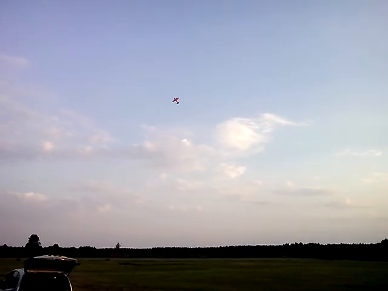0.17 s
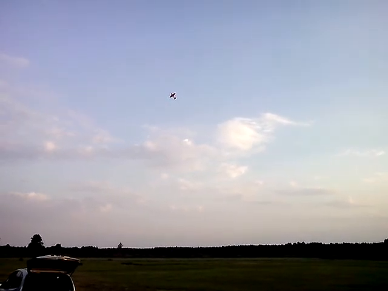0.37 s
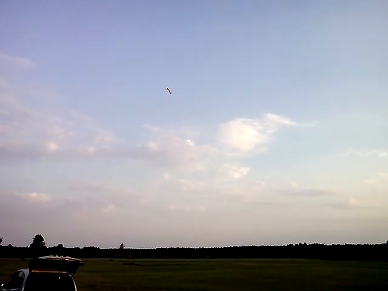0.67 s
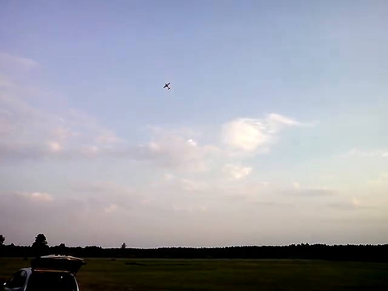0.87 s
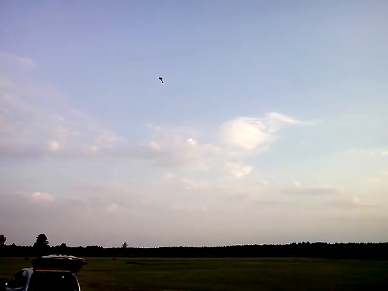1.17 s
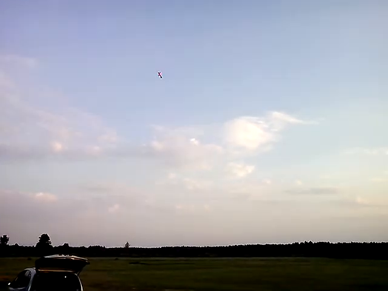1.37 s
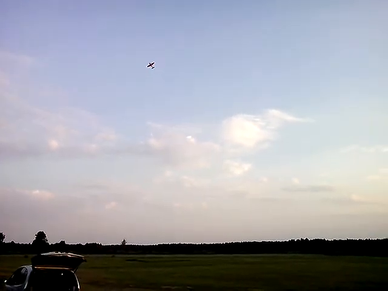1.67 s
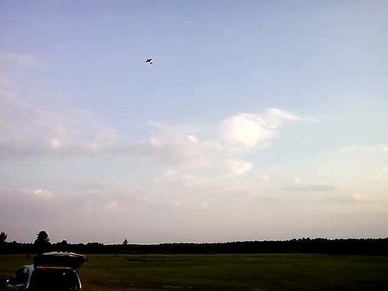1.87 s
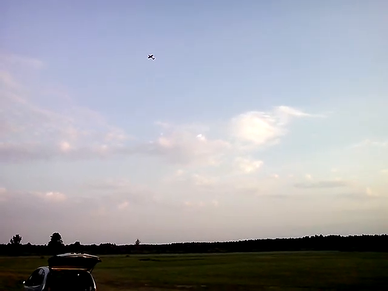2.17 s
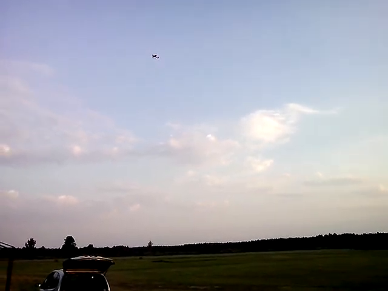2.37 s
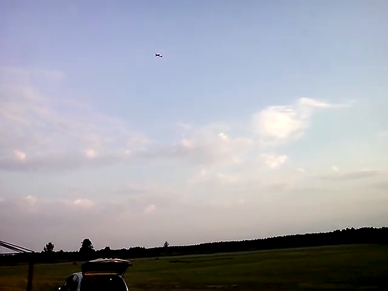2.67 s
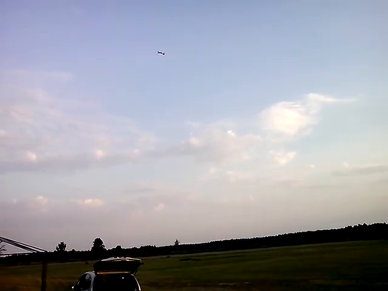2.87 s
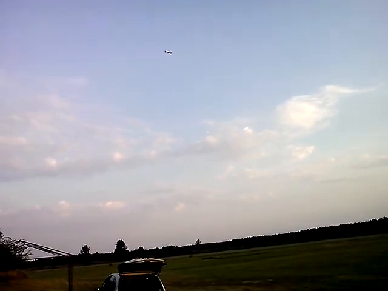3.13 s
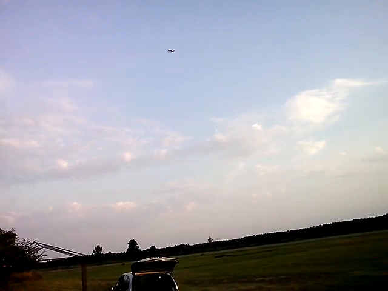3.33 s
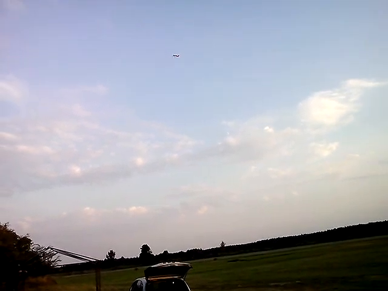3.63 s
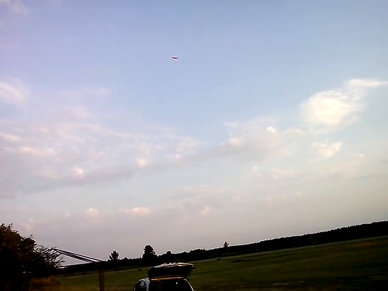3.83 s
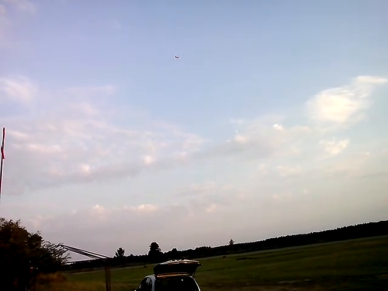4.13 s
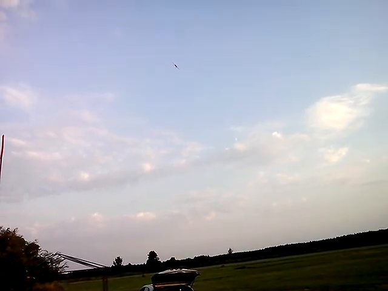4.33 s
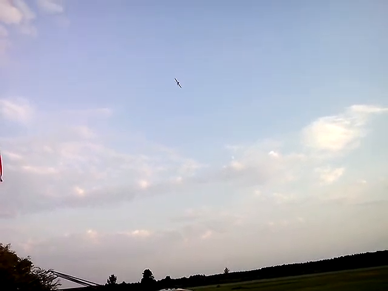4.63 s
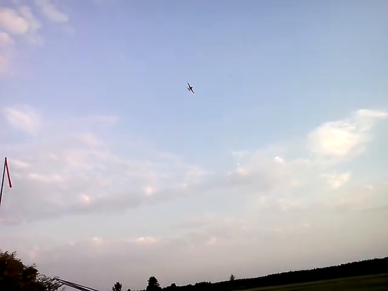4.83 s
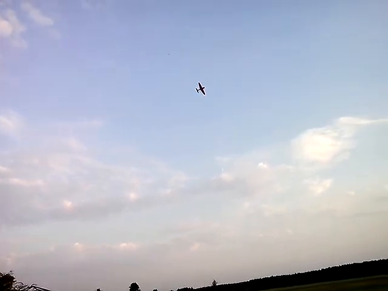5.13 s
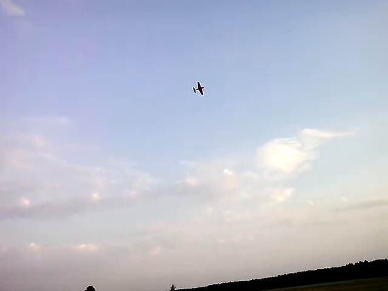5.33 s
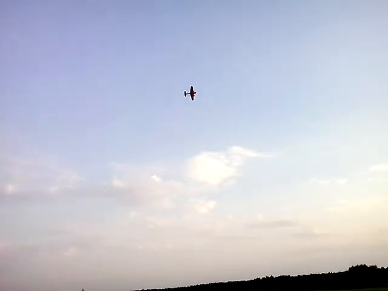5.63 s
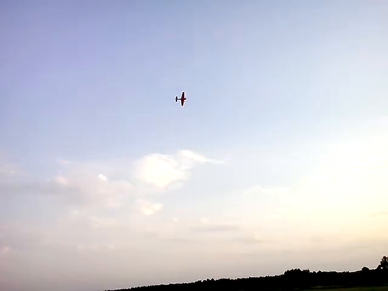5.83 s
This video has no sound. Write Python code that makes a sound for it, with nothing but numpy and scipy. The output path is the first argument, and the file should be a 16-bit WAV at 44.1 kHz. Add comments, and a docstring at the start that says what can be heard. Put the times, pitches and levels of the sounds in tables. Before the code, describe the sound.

Over an open field, a small model aircraft engine revs twice, drops to a popping idle, then buzzes loudly as it dives nearer.

```python
"""The buzz of a model plane's two-stroke petrol engine over an open field: two bursts of throttle, a
sputtering idle overhead, then full power as it swoops towards the listener. Each turn of the crankshaft
releases a pressure pulse that excites the resonances of pipe and muffler; shaft and propeller add
harmonic tones, and unburnt mixture pops after missed firings. The ground reflects the exhaust. Beneath
it the air rushes softly and a camera hums; the right channel trails the left."""
import sys
import numpy as np
from scipy import signal
from scipy.fft import rfft, irfft, next_fast_len
from scipy.io import wavfile
from scipy.ndimage import uniform_filter1d, map_coordinates

SR = 44100
rng = np.random.default_rng(int(sys.argv[2]) if len(sys.argv) > 2 else 0)


def master(y):
    """Save y as 16-bit WAV."""
    cut = np.clip(np.atleast_2d(y).T, -1, 1)
    pcm = np.round(cut * 32767)  # scale
    wavfile.write(sys.argv[1], SR, pcm.astype(np.int16))


N = 264600
TIME = np.arange(N) / SR

# Resonances of the muffler. Each row: frequency in Hz, relative gain in dB.
MUFFLER_RESPONSE = [(60, -20), (100, -11.5), (170, 2), (230, -2), (305, 5.5), (400, -17.5), (470, -5.5)]
# Hard firings after missed ones. Each row: start in seconds, relative level in dB, rasp offset in dB.
AFTERFIRES = [(0.695, -20.5, -17), (0.714, -15, -16), (0.735, -16, -14.5), (0.756, -20, -9.5),
              (1.836, -19, -15.5), (1.869, -16.5, -22.5), (1.903, -16.5, -23), (1.952, -19, -26.5),
              (2.03, -24.5, -24), (2.548, -29.5, -13.5), (2.594, -32, -16), (2.641, -30.5, -11.5),
              (2.664, -28.5, -17), (2.685, -26, -18), (2.705, -26.5, -16.5), (2.91, -27.5, -24),
              (3.593, -38, -23), (3.87, -29.5, -17.5), (3.897, -31, -20), (3.951, -30.5, -17.5),
              (4.031, -29.5, -18), (4.078, -25.5, -14.5), (4.1, -24, -20), (4.121, -25.5, -20),
              (4.249, -26.5, -20)]


def crankshaft():
    """Turns per second as heard: inertia makes speed lag the throttle; the Doppler effect lowers it."""
    # Each row: start in seconds, speed the shaft heads for in turns per second.
    throttle = [(0.0, 100.4), (0.04, 114.5), (.32, 113.6), (0.545, 74.3), (0.792, 90.8), (1.25, 112),
                (1.615, 92), (1.755, 48.2), (1.99, 27), (2.533, 53.8), (2.69, 88.3), (2.897, 32.6),
                (3.926, 51), (4.107, 80.7), (4.337, 107), (5.069, 108.3)]
    spin_up_s, run_down_s, servo_s = .204, .369, .06
    speed = np.full(N, float(throttle[0][1]))
    for start, goal in throttle[1:]:
        at = int(start * SR)
        lag = spin_up_s if goal > speed[at] else run_down_s
        speed[at:] = goal + (speed[at] - goal) * np.exp(-TIME[:N - at] / lag)
    doppler = 1 - .048 * np.maximum(TIME - 5.373, 0)  # as the plane draws level
    return doppler * uniform_filter1d(speed, int(servo_s * SR), mode="nearest")


def firings(speed, turns, evenness):
    """Cycle-to-cycle variation: one firing a turn, less regular in time and size at idle."""
    port_phase = .27
    at = np.interp(np.arange(int(turns[-1])) + port_phase, turns, np.arange(N))
    slack = 1 - evenness[at.astype(int)]
    chance = rng.standard_normal((len(at), 2))
    spread_db, jitter_s = .5 + 1.2 * slack, .000004 + .00007 * slack
    equal_power = np.sqrt(SR / speed[at.astype(int)])  # the same mean power at any speed
    return at / SR + jitter_s * chance[:, 1], amp(spread_db * chance[:, 0]) * equal_power


def puffs(times, sizes, rough, decay_s):
    """Each port opening gives a pressure pulse and a dying jet; rough is the turbulent share of power."""
    fall = np.exp(-np.arange(SR // 20) / SR / decay_s)
    power = np.abs(signal.fftconvolve(pulses(times, sizes ** 2), fall / fall.sum())[:N])
    rough = np.clip(rough, 0, 1)
    return np.sqrt(1 - rough) * pulses(times, sizes) + np.sqrt(rough * power) * rng.standard_normal(N)


def exhaust(times, sizes, levels_db, load):
    """Source and filter: firings excite a low bark and a high rasp; growl and edge are their tops."""
    bark_db, growl_db, rasp_db, edge_db = levels_db
    rocking_db = 4.5  # the colour drifts as the plane rocks
    growl_db = growl_db + rocking_db * wobble(4.615)
    edge_db = edge_db + rocking_db * wobble(4.7)
    bark_rough, rasp_rough = turbulence(load)
    strokes = puffs(times, sizes, bark_rough, decay_s=.004)
    bark = pipe(dispersion(strokes, spread_s=.0015, centre_hz=950), 488, 2045)
    jets = puffs(times, sizes, rasp_rough, decay_s=.006)
    rasp = dispersion(pipe(jets, 2250, 6750), spread_s=.0006, centre_hz=4000)
    outflow = amp(bark_db) * shelf(bark, growl_db, 1360) + amp(rasp_db) * shelf(rasp, edge_db, 3730)
    return wing_reflection(flares(outflow), strength=.25 + .12 * (1 - ramp(2.6, 4.4)), lag_s=.00108)


def turbulence(load):
    """Turbulent shares of bark and rasp: greater at idle and in the fuselage's acoustic shadow."""
    # Each row: centre and half width in seconds, share added to the bark, share added to the rasp.
    shadows = [(.17, .2, .27, .45), (.55, .12, .1, .05), (1.38, .15, .3, .4), (1.66, .15, .14, .4),
               (4.5, .14, .2, .1), (5.4, .3, .08, .17)]
    bark_shadow, rasp_shadow = bells(shadows)
    slack, head_on, abreast = 1 - load, ramp(4.3, 5.7), ramp(5.2, 5.8)
    bark = .04 + .27 * slack + .09 * abreast + bark_shadow
    rasp = .27 + .45 * slack - .13 * head_on + rasp_shadow
    return bark, rasp


def pipe(x, lo_hz, hi_hz):
    """Resonance and directivity: the pipe's colour changes as the plane climbs, idles, dives and nears."""
    # One spectrum for each attitude. Each row: frequency in Hz, relative gain in dB.
    climbing = [(420, 8.5), (560, -1), (760, -7.5), (980, -4), (1220, 5.5), (1440, -10), (1650, -3),
                (1850, -3), (2060, -13.5), (2300, -17.5), (2900, -22.5), (3550, -21.5), (4000, -18.5),
                (4600, -24.5), (5400, -20.5), (7000, -30.5)]
    idling = [(420, 0), (560, 4.5), (780, -15), (980, -6.5), (1200, -6.5), (1420, -14), (1650, -1.5),
              (1870, -12.5), (2080, -14.5), (2300, -17.5), (2620, -16.5), (2900, -21), (3550, -19.5),
              (4600, -23.5), (5600, -27.5), (7000, -26.5)]
    diving = [(420, -1.5), (560, 1.5), (780, -7.5), (980, 1), (1200, -1.5), (1420, -5), (1650, -3),
              (1900, -1.5), (2250, -10), (2600, -24.5), (3100, -16), (3700, -11), (4300, -13), (4700, -22),
              (5600, -14.5), (7000, -28)]
    nearby = [(420, -3.5), (560, 5.5), (780, -4), (1000, 4), (1200, 4.5), (1420, -6.5), (1650, -2),
              (1900, 1), (2300, -6.5), (2900, -21), (3500, -8), (4600, -21.5), (5600, -13.5), (7000, -23.5)]
    idle, dive, close = ramp(1.9, 2.1), ramp(4.28, 4.61), ramp(4.98, 5.39)
    shares = [(climbing, 1 - idle), (idling, idle - dive), (diving, dive - close), (nearby, close)]
    return sum(share * resonator(x, colour, lo_hz, hi_hz) for colour, share in shares)


def dispersion(x, spread_s, centre_hz):
    """Group delay rises with frequency: the muffler lets the lows out first, as a short upward chirp."""
    def response(hz):
        offset_hz = np.minimum(hz, 3 * centre_hz) - centre_hz
        return np.exp(-1j * np.pi * spread_s * offset_hz ** 2 / centre_hz)
    return filtered(x, response)


def loudness(speed, full_db, per_octave_db, approach_db=0):
    """A power law of speed, in dB, plus the gain from less spreading loss as the plane closes in."""
    full_speed = 105  # turns per second
    return full_db + per_octave_db * np.log2(speed / full_speed) + approach_db * ramp(4.34, 5.58)


def exhaust_levels(speed):
    """Radiation grows with speed, and swells as the pipe faces the listener or the engine labours."""
    # Each row: centre and half width in seconds, then dB added to bark, growl, rasp, edge and boom.
    swells = [(.02, 0.055, -1.5, 13, 2.5, 3, 0), (0.161, 0.034, -0.5, 2, 3, -3, 0),
              (0.467, 0.08, 0, -2, 0.5, 4, 0), (0.781, 0.34, 7, -4.5, 8.5, -2.5, 0),
              (1.3, .1, -2, -0.5, -1.5, -6, 0), (1.49, 0.068, 0.5, 7.5, 1.5, -3, 0),
              (1.761, 0.21, 4.5, -1.5, 6.5, 0.5, -6), (2.11, 0.056, 4.5, 2, 1.5, 8, 5.5),
              (2.7, 0.046, 1.5, -6, 12.5, -3, 5.5), (2.8, 0.17, 7.5, 1, 6.5, 4, 5),
              (3.41, 0.056, 4.5, 3.5, 6, 0, 2), (4.09, 0.23, 8.5, 6, 9, -0.5, 4),
              (4.379, 0.1, 1.5, 0, 2, -5.5, 5.5), (4.74, 0.26, 0.5, -4.5, 7.5, -2, 16),
              (5.32, 0.28, 0.5, 2, 2, 3.5, 0), (5.809, 0.089, -0.5, 4.5, 1, 2.5, 0),
              (5.961, 0.044, 1, 5.5, 1, 1, 0)]
    bark_db = loudness(speed, -37, 11.7, approach_db=9.66)
    growl_db = loudness(speed, -1.3, 1.3)
    rasp_db = loudness(speed, -48, 11.9, approach_db=14.7)
    edge_db = np.full(N, -.35)
    boom_db = loudness(speed, -42, 7.5)
    return bells(swells) + [bark_db, growl_db, rasp_db, edge_db, boom_db]


def flares(x):
    """Directivity: as the plane rolls, single bands of the exhaust briefly stand out or fade."""
    # Each row: centre and half width in seconds, frequency in Hz, gain in dB.
    lobes = [(0.139, 0.058, 650, 8.5), (.15, 0.07, 930, 10), (.26, 0.049, 1440, 4), (.42, 0.076, 5200, 6),
             (.45, 0.048, 3620, 9.5), (.48, 0.1, 780, 2), (.53, 0.075, 1265, 5), (.4, 0.24, 1014, -5),
             (.55, 0.065, 6000, 4), (.77, .1, 3500, 9), (.79, 0.055, 4680, 3), (.95, .2, 1150, 2),
             (1.78, .09, 1100, -2), (.15, .2, 4400, 2), (5.1, .12, 4400, 2), (1.041, 0.1, 5240, 7),
             (1.6, 0.069, 1700, -12), (1.7, 0.061, 5300, 7), (1.62, 0.11, 1130, 0.5),
             (2.84, .08, 990, -0.5), (3.41, 0.08, 4350, 8), (4.25, 0.11, 1340, 5), (4.351, 0.2, 1900, 5.5),
             (4.55, 0.13, 990, -1), (4.6, 0.18, 1536, -6), (4.68, 0.19, 5800, -5.5), (5, .08, 1900, -1.5),
             (5.17, 0.13, 6000, -6.5), (5.359, 0.21, 4200, 5.5), (5.53, 0.043, 5400, 2.5),
             (5.75, 0.062, 1840, 5), (5.8, 0.056, 3670, 7)]
    def band(centre_hz, relative_width=.077):
        return filtered(x, lambda hz: np.exp(-((hz / centre_hz - 1) / relative_width) ** 2))
    return x + sum((amp(db) - 1) * bell(s, width) * band(hz) for s, width, hz, db in lobes)


def wing_reflection(x, strength, lag_s):
    """Comb filtering: the path by way of the wing drifts, so the overtones swell in turn."""
    reflection = delayed(x, lag_s * (1 + .2 * wobble(3)))
    return (x + strength * reflection) / np.sqrt(1 + strength ** 2)


def muffler(times, sizes, boom_db, powered):
    """Cavity resonance: throttled back, single firings thud in the muffler with a clear, low pitch."""
    strokes = puffs(times, sizes, rough=.02, decay_s=.008)
    return amp(boom_db) * np.sqrt(1 - powered ** 2) * resonator(strokes, MUFFLER_RESPONSE, 94, 407)


def misfires(times, depth_db):
    """Incomplete combustion: the gain dips just before a pop and on the turn that the pop replaces."""
    before_s, after_s = .021, .008
    until_pop = np.transpose(AFTERFIRES)[0] - times[:, None]
    return amp(depth_db * np.any((until_pop > -after_s) & (until_pop < before_s), axis=1))


def pops():
    """Impulse excitation: unburnt mixture goes off in one hard firing that rings pipe and muffler."""
    times, level_db, rasp_db = np.transpose(AFTERFIRES)
    bark = puffs(times, amp(level_db + 14), rough=.3, decay_s=.0013)
    crack = puffs(times, amp(level_db + rasp_db + 22), rough=.6, decay_s=.0015)
    thud = amp(-16) * pulses(times, np.ones(len(times)))
    return pipe(bark, 480, 1950) + pipe(crack, 2240, 6450) + resonator(thud, MUFFLER_RESPONSE, 85, 411)


def drone(turns, speed, powered):
    """Rotational harmonics: under power, shaft and two-blade propeller radiate four clean tones."""
    # The second harmonic leads the climb, the third the dive. Each row: time in seconds, level in dB.
    second_climb = [(0, -32.5), (.14, -33.5), (.27, -25.5), (.38, -30.5), (.46, -39.5), (.55, -29),
                    (.66, -28.5), (.7, -36.5), (.74, -33.5), (.85, -36.5), (1.14, -50), (1.33, -39.5),
                    (1.45, -27), (1.66, -30.5), (1.85, -47.5)]
    third_dive = [(4.4, -41), (4.54, -34.5), (4.78, -26.5), (5.56, -26.5), (5.77, -30.5), (6, -55.5)]
    diving, banked, close = TIME > 3, ramp(.7, 1.5), ramp(4.84, 6.3)
    levels_db = [loudness(speed, -43.5, 44) - 2 * banked - 2 * diving + 17.5 * close,
                 np.where(diving, -39.5, curves(second_climb)[0]),
                 np.where(diving, curves(third_dive)[0], loudness(speed, -45, 28) + 5 * banked),
                 loudness(speed, -48, 39, approach_db=.45) + 3 * wobble(16)]
    tones = sum(amp(db + 1.1 * wobble(25)) * np.cos(2 * np.pi * order * (turns - .45))
                for order, db in enumerate(levels_db, 1))
    return np.sqrt(2) * powered * tones


def idle_drone(turns, powered):
    """Throttled back, the shaft's third harmonic joins the firings into one rising and falling note."""
    # Each row: time in seconds, level in dB.
    third_idle = [(1.85, -49), (1.96, -56), (2.08, -50), (2.25, -70), (2.4, -55), (2.62, -64), (2.78, -43),
                  (2.92, -57), (3.08, -49.5), (3.3, -64), (3.45, -57), (3.8, -68), (4, -53), (4.22, -43.5),
                  (4.4, -56)]
    tone = np.sqrt(2) * np.cos(2 * np.pi * 3 * (turns - .34))
    return (1 - powered) * amp(curves(third_idle)[0]) * tone


def field(x, load, t60_s):
    """Reflection and scattering: grass returns a dull echo, bushes and cars a tail, most at idle."""
    # Each row: time in seconds, echo delay in seconds, reflection coefficient.
    ground = [(0, 0.0047, 0.67), (.75, 0.0057, 0.36), (1.1, 0.0059, 0.38), (1.92, 0.0067, 0.7),
              (2.1, 0.0067, 0.68), (5, .0063, 0.65), (5.4, 0.0063, 0.51), (6, 0.0056, 0.058)]
    lag_s, bounce = curves(ground)
    echo = bounce * filtered(delayed(x, lag_s), lambda hz: 1 / (1 + (hz / 2000) ** 2))
    t = TIME[:SR // 2]
    tail = rng.standard_normal(len(t)) * amp(-60 * t / t60_s) * (1 - np.exp(-t / .027))
    scatter_db = -10 - 7 * load
    return x + echo + signal.fftconvolve(amp(scatter_db) * x, tail / np.linalg.norm(tail))[:N]


def microphones(x):
    """Decorrelation: nearby things scatter the treble, so it differs between the two microphones."""
    # Each row: frequency in Hz, scattered share of the power.
    scattered = [(600, .005), (1400, .06), (3600, .1), (4800, .22), (7000, .3)]
    t, t60_s = TIME[:SR // 20], .04
    tail = unit(rng.standard_normal(len(t)) * amp(-60 * t / t60_s)) / np.sqrt(len(t))
    side = filtered(signal.fftconvolve(x, tail)[:N], lambda hz: np.sqrt(along(scattered, hz)))
    direct = filtered(x, lambda hz: np.sqrt(1 - along(scattered, hz)))
    return np.array([direct + side, direct - side])


def background():
    """The noise floor: a low hum, modulated in phase and level, and the broadband rush of the air."""
    # Each row: frequency in Hz, relative level in dB.
    air_spectrum = [(25, -17.5), (45, -21), (65, -25.5), (100, 1.5), (400, 0.5), (1500, -10), (2500, -18.5),
                    (6500, -24), (8000, -36)]
    hum = np.sqrt(2) * np.sin(2 * np.pi * 61 * TIME + .39 * wobble(29))
    air = unit(filtered(rng.standard_normal(N), lambda hz: amp(along(air_spectrum, hz))))
    return amp(-54.5 + 1.3 * wobble(9.6)) * hum + amp(-47.5) * air


def resonator(x, colour, lo_hz, hi_hz, size=8192, order=12):
    """A minimum-phase filter of unit energy rings with one band of a spectrum."""
    hz = np.fft.rfftfreq(size, 1 / SR) + 1
    skirts = np.sqrt((1 + (lo_hz / hz) ** order) * (1 + (hz / hi_hz) ** (2 * order)))
    gain = amp(along(colour, hz)) / skirts
    cepstrum = irfft(np.log(gain + 1e-5))[:size // 2]
    cepstrum[1:] *= 2  # folding the cepstrum makes the response causal
    response = irfft(np.exp(rfft(cepstrum, size)))[:size // 4]
    return signal.fftconvolve(x, response / np.linalg.norm(response))[:N]


def shelf(x, gain_db, corner_hz):
    """A shelving filter sets the part above the corner gain_db higher than the part below."""
    upper = filtered(x, lambda hz: 1 - 1 / (1 + (hz / corner_hz) ** 12))
    return amp(-gain_db / 3) * (x - upper) + amp(2 * gain_db / 3) * upper


def filtered(x, response):
    """Linear filtering: the spectrum of x times a complex frequency response."""
    size = next_fast_len(N + SR // 2)
    return irfft(rfft(x, size) * response(np.fft.rfftfreq(size, 1 / SR)), size)[..., :N]


def delayed(x, lag_s):
    """Propagation delay along a path of changing length."""
    return np.interp(TIME - lag_s, TIME, x, left=0)


def pulses(times, sizes, half_taps=8):
    """Band-limited impulses: windowed sincs placed between samples."""
    at = np.asarray(times)[:, None] * SR
    taps = np.floor(at).astype(int) + np.arange(1 - half_taps, half_taps + 1)
    shape = np.sinc(taps - at) * np.cos(np.pi * (taps - at) / (2 * half_taps)) ** 2
    inside = (taps >= 0) & (taps < N)
    return np.bincount(taps[inside], (shape * sizes[:, None])[inside], N)


def amp(db):
    """Decibels to amplitude ratio."""
    return 10 ** (np.asarray(db) / 20)


def unit(x):
    """x at rms 1."""
    return x / np.sqrt(np.mean(x ** 2) + 1e-20)


def along(points, hz):
    """Interpolation of (Hz, value) points on a logarithmic axis."""
    knots_hz, values = np.transpose(points)
    return np.interp(np.log(hz + 1), np.log(knots_hz), values)


def curves(rows):
    """Linear envelopes, one for each column after the time."""
    times, *columns = np.transpose(rows)
    return [np.interp(TIME, times, column) for column in columns]


def ramp(start_s, end_s):
    """A linear rise from 0 to 1."""
    return np.clip((TIME - start_s) / (end_s - start_s), 0, 1)


def bell(centre_s, width_s):
    """A Gaussian envelope."""
    return np.exp(-((TIME - centre_s) / width_s) ** 2)


def bells(rows):
    """Summed Gaussian envelopes, one sum for each column after centre and half width."""
    return sum(np.outer(heights, bell(centre_s, width_s)) for centre_s, width_s, *heights in rows)


def wobble(rate):
    """Smooth random modulation with rate knots a second."""
    return map_coordinates(rng.standard_normal(int(N * rate / SR) + 4), [TIME * rate])


def scene():
    """Superposition: the crankshaft times firings and tones, which add to the pops and background."""
    speed = crankshaft()
    turns = np.cumsum(speed) / SR
    load = np.clip((speed - 55) / 42, 0, 1)
    powered = np.clip((speed - 76) / 13, 0, 1)
    pull = np.clip(np.gradient(speed) * SR / 70, 0, 1)  # an engine gaining speed fires evenly
    times, sizes = firings(speed, turns, evenness=np.maximum(load, pull))
    stumble = uniform_filter1d(misfires(TIME, depth_db=-1), size=400)
    *exhaust_db, boom_db = exhaust_levels(speed)
    buzz = exhaust(times, sizes * misfires(times, depth_db=-8), exhaust_db, load)
    engine = buzz + muffler(times, sizes, boom_db, powered) + pops()
    outdoors = field(engine, load, t60_s=.33)
    tones = stumble * drone(turns, speed, powered) + idle_drone(turns, powered)
    return microphones(outdoors + tones + background())


def record(dry):
    """Phase and level differences set the channels apart; faint hiss and a steep low-pass follow."""
    # Each row: frequency in Hz, level of the left channel over the right in dB.
    balance = [(100.0, 1.5), (200.0, -0.5), (420.0, 3), (740.0, -4.5), (860.0, 19.5), (1020.0, -8.5),
               (1200.0, -12.5), (1420.0, 4.5), (1650.0, -12.5), (1900.0, 3), (2600.0, 3.5), (3500.0, 3),
               (6500.0, 9.5)]
    # Each row: frequency in Hz, phase lag of the right channel in radians.
    phase_lag = [(0, 0), (640, 4.5), (800, 7.5), (900, 5), (1150, 8), (1250, 11), (1370, 12.1),
                 (1520, 10.5), (1760, 15), (2000, 15.5), (2300, 19), (2750, 26), (2950, 26.5), (3270, 29.5),
                 (4200, 36), (4650, 42), (5080, 46.5), (5600, 52.5), (6290, 60.5), (7400, 70)]
    def channels(hz):
        ratio = amp(along(balance, hz))
        lag = np.exp(-1j * np.interp(hz, *np.transpose(phase_lag)))
        return np.array([ratio, lag]) * np.sqrt(2 / (1 + ratio ** 2))
    hiss = amp(-65.5) * rng.standard_normal((2, N))
    cutoff_hz = 7300
    return filtered(filtered(dry, channels) + hiss, lambda hz: 1 / np.sqrt(1 + (hz / cutoff_hz) ** 80))


dry = scene()
out = record(dry)
master(out)
```